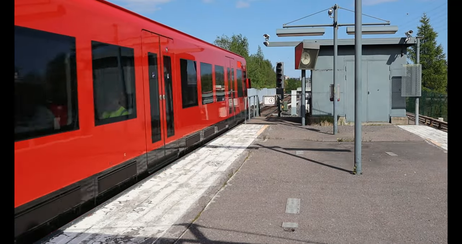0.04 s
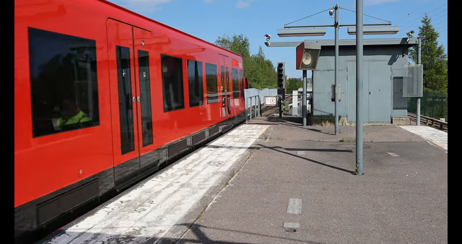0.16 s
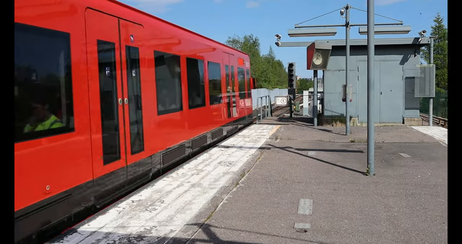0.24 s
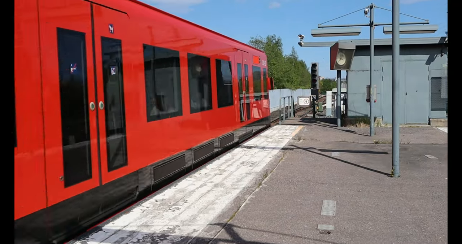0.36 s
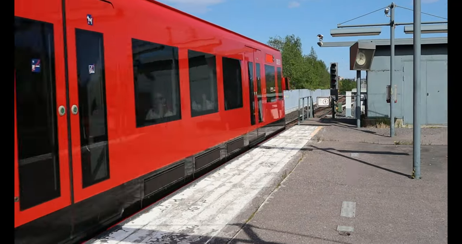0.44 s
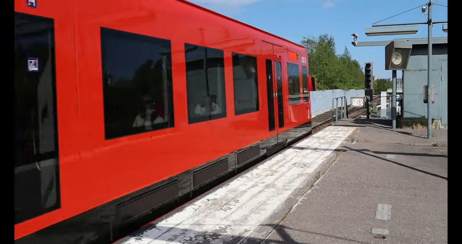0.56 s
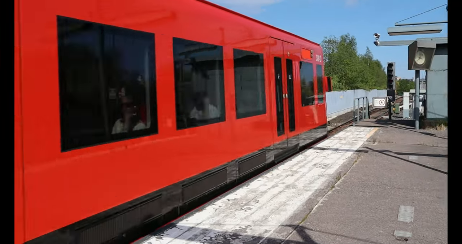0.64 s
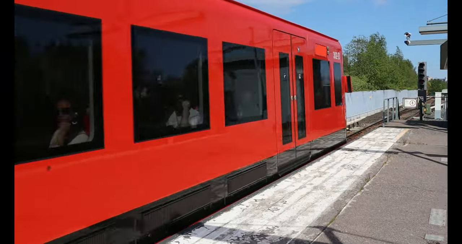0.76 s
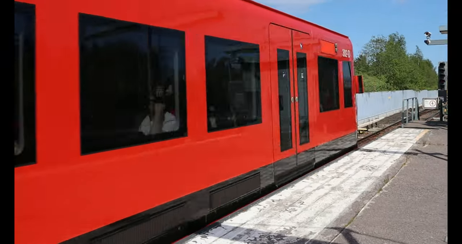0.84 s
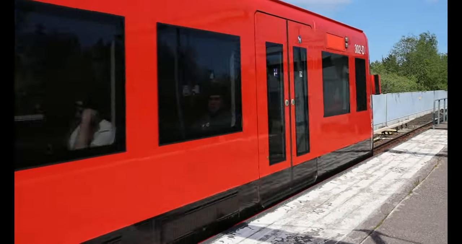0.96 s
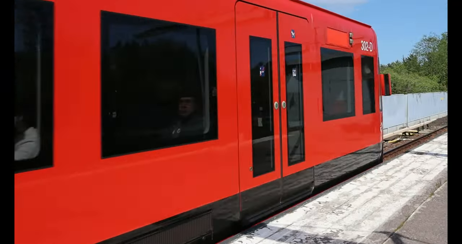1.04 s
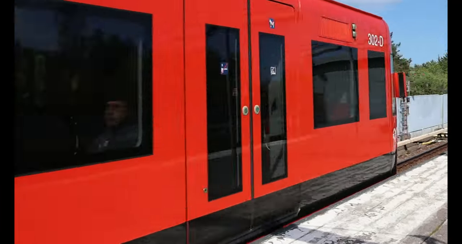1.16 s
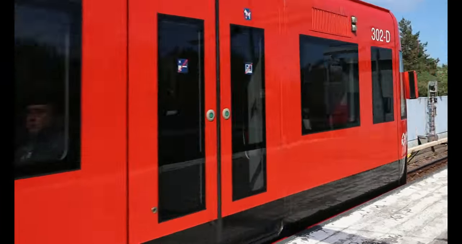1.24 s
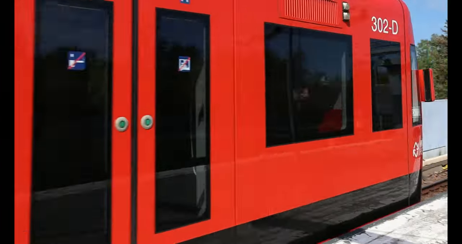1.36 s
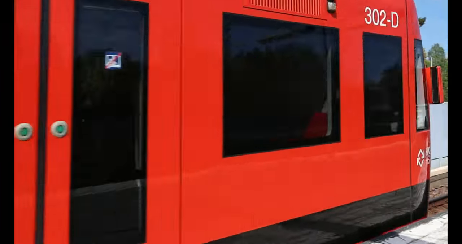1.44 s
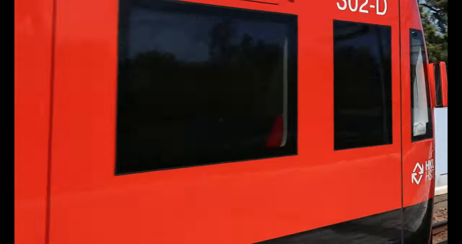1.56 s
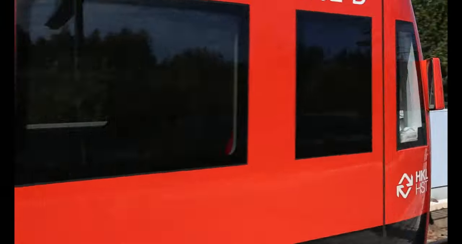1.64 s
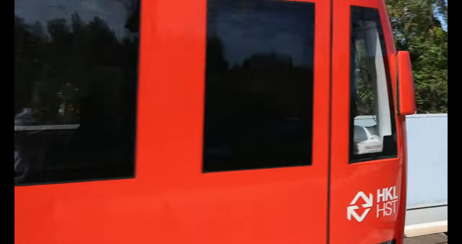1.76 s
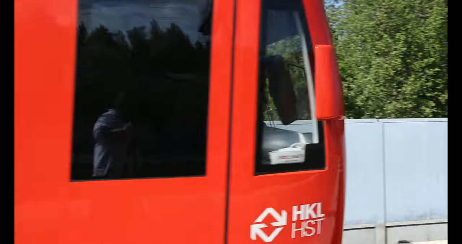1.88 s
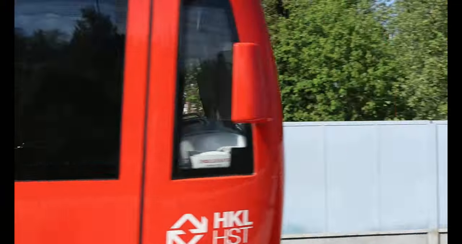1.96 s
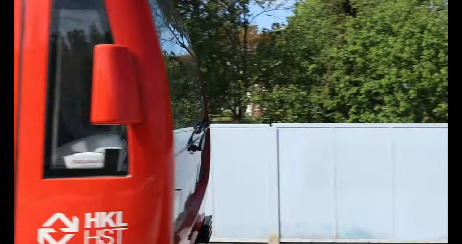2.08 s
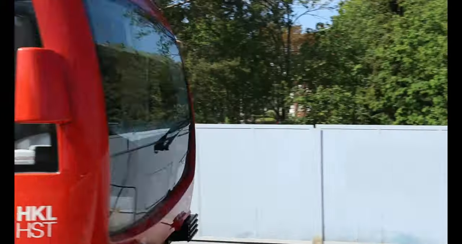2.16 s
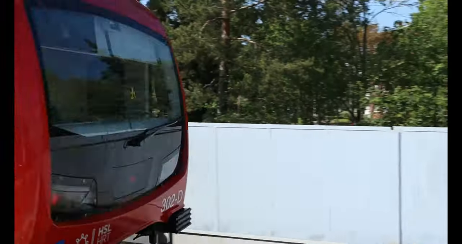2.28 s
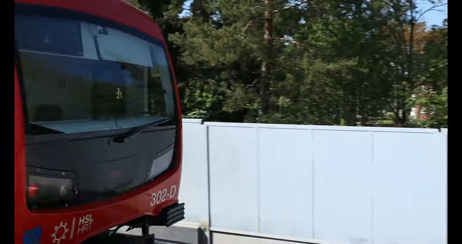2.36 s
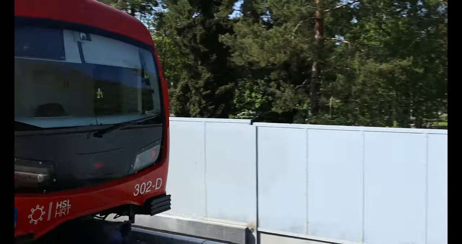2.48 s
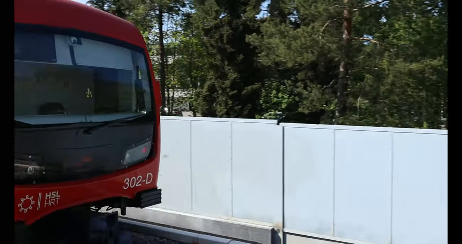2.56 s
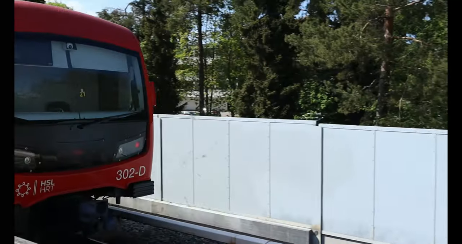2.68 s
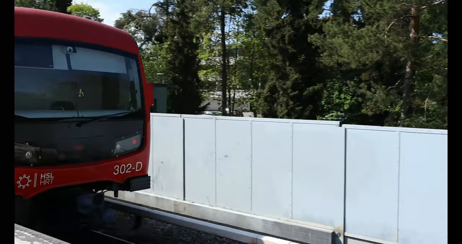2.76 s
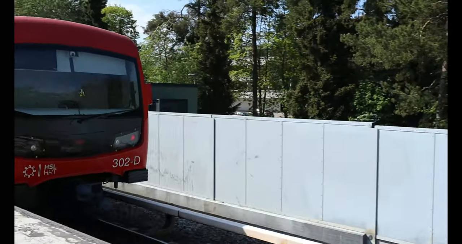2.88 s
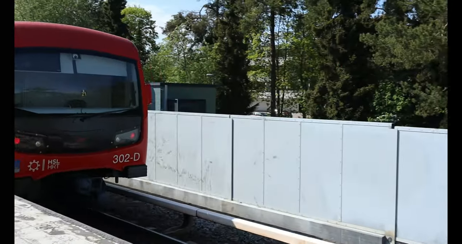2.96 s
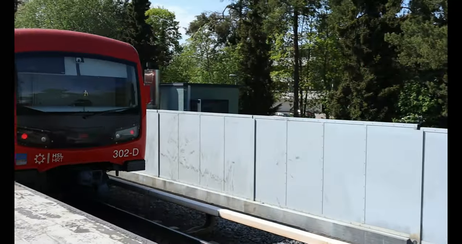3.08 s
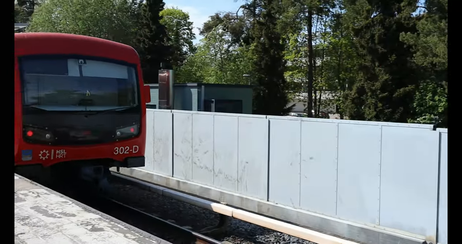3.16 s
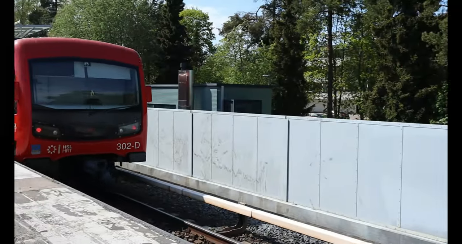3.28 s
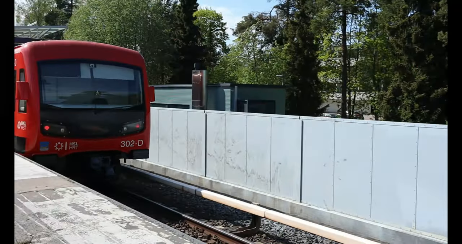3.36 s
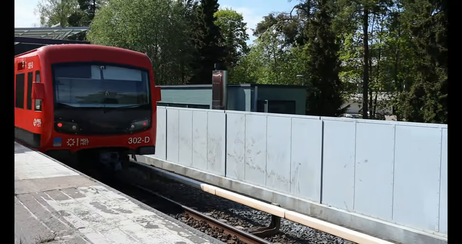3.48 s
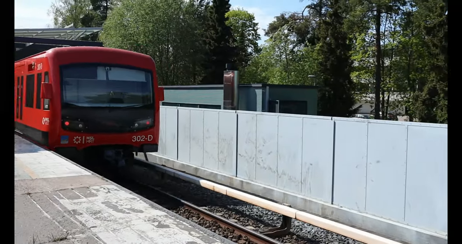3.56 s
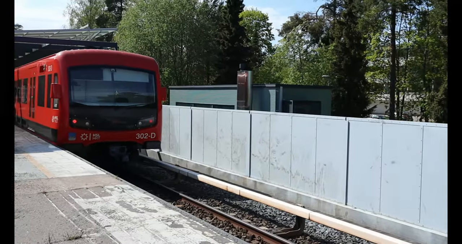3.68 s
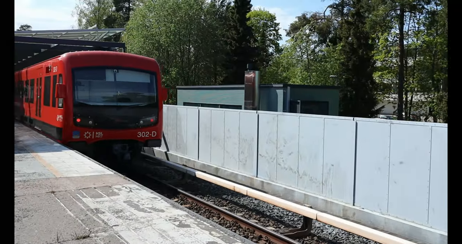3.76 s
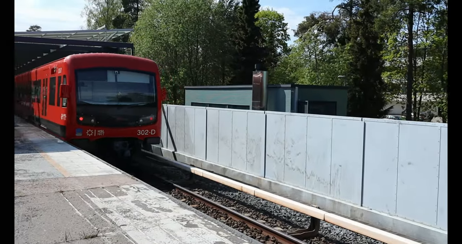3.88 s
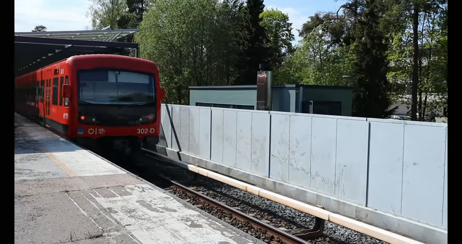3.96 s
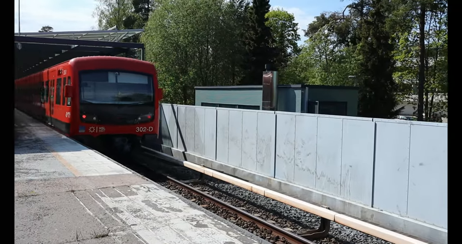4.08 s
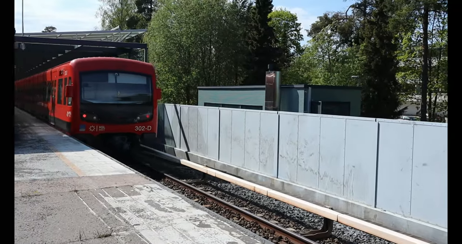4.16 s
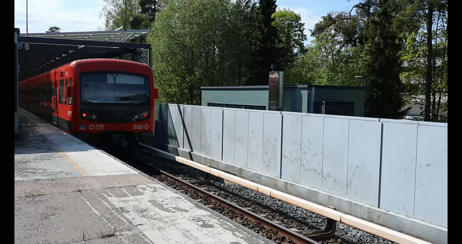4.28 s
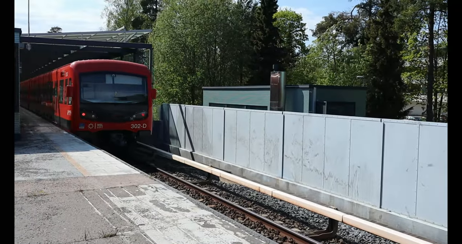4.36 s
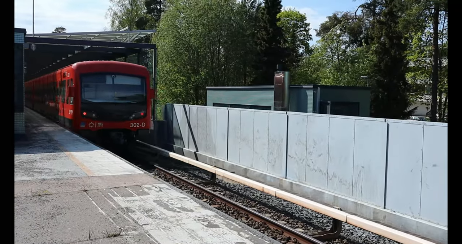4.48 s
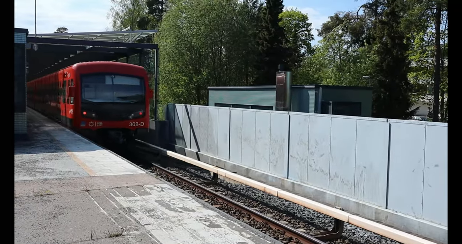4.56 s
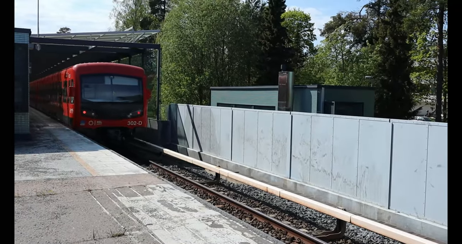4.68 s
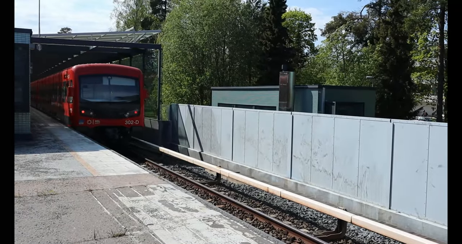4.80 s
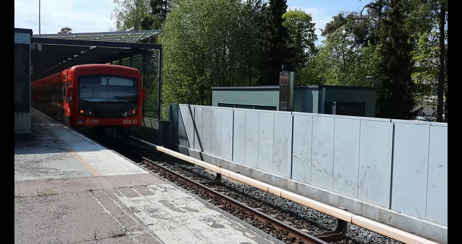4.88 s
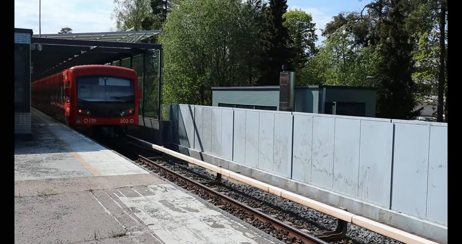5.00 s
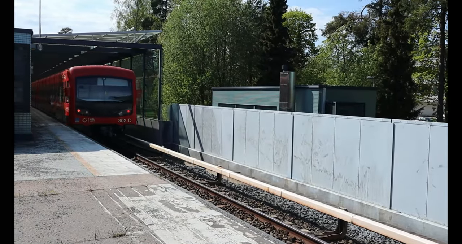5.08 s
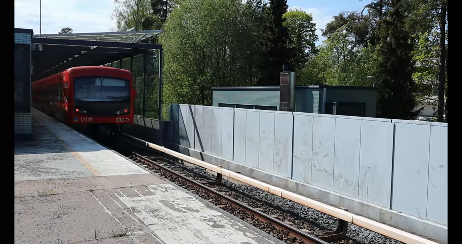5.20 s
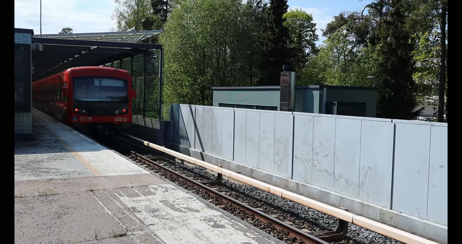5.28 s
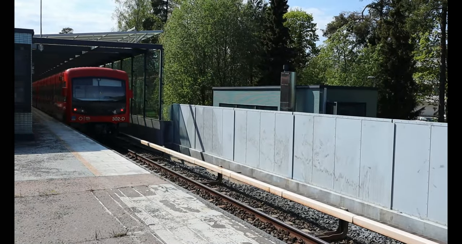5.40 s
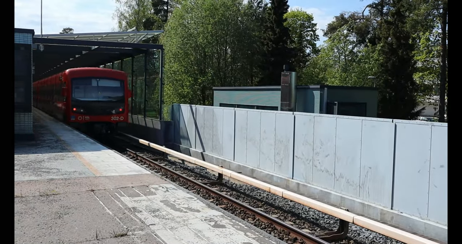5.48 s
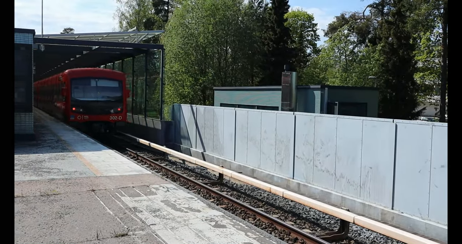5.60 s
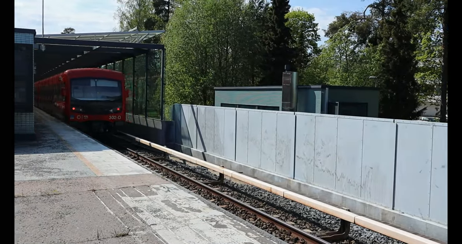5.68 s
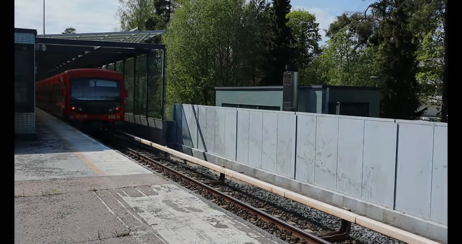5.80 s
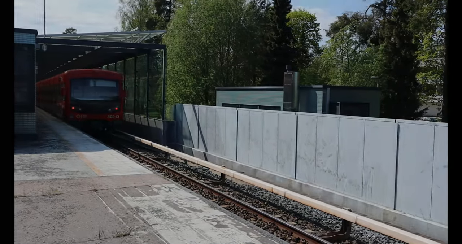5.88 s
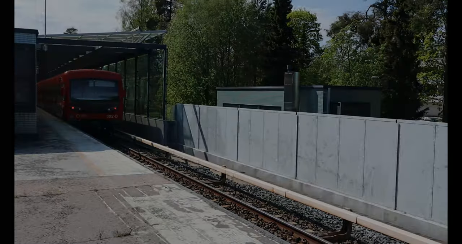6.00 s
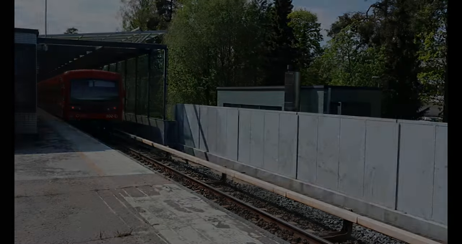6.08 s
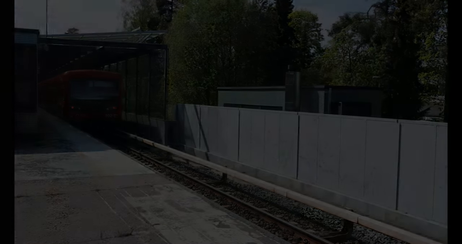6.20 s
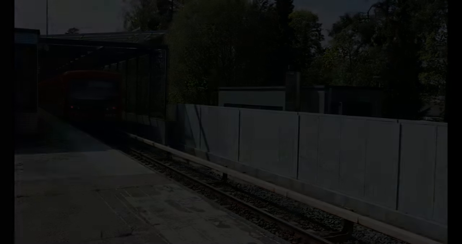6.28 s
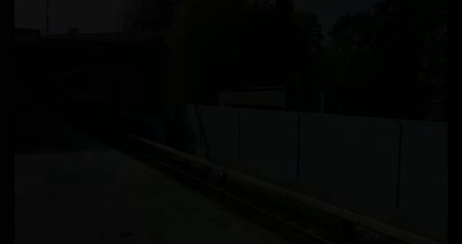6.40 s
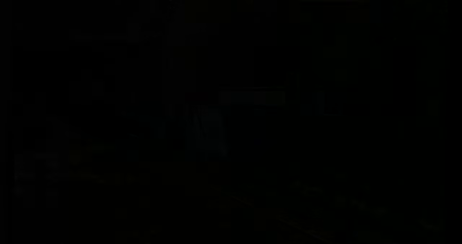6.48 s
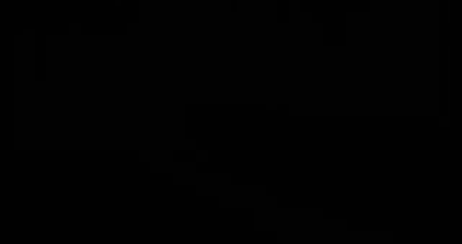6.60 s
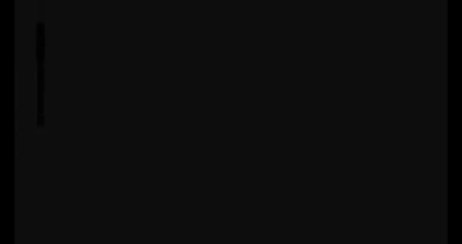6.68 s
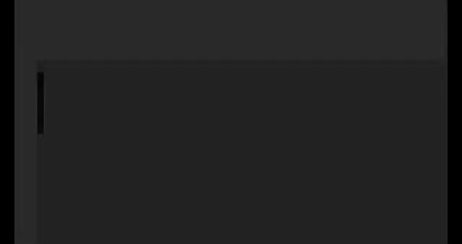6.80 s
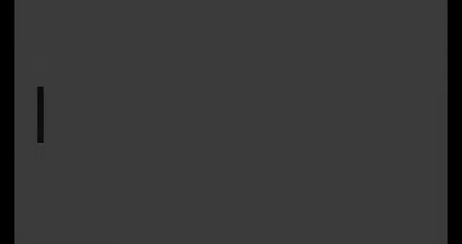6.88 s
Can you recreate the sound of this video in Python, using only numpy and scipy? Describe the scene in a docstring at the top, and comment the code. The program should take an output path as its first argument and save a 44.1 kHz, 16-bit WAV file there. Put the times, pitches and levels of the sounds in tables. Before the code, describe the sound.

Stereo microphone on a platform edge. It starts abruptly inside the roar of passing metro cars, with throaty howls, a sharp tick and heavy wheel knocks while a high whine grows. The last car goes by and fluttering steel-rail singing opens up, with short squeals. The train recedes, its whine steadier and sinking in pitch, over soft deep thumps and roofed-in rumble, before a partly faded cut.

```python
"""A metro train pulls away along an open-air platform: at first wheels roar, car bodies drum, some wheels
howl and knock, and a high drive whine grows; all tones and noises are computed from level and pitch tables.
From two seconds the tail passes: bare rails sing (fluttering resonances) and flanges scrape briefly.
The whine roughly holds its pitch, then sinks from about 4 s, as the wheel treble drops and the rumble deepens.
A roof throws noise back from about 5 s; the level then fades part of the way and the sound stops."""
import sys
import numpy as np
from scipy import signal
from scipy.fft import rfft, irfft, next_fast_len
from scipy.io import wavfile
from scipy.ndimage import uniform_filter1d, minimum_filter1d, map_coordinates

SR = 44100
rng = np.random.default_rng(int(sys.argv[2]) if len(sys.argv) > 2 else 0)


def unload_audio(sound):
    """Save the sound as a 16-bit wav file, at the path given as the first command line argument."""
    columns = np.transpose(np.atleast_2d(sound))
    # keep every value between -1 and 1, then stretch to whole-number steps
    steps = np.round(np.clip(columns, -1, 1) * 32767)
    wavfile.write(sys.argv[1], SR, steps.astype(np.int16))


N = 306450
TIME = np.arange(N) / SR
SIZE = next_fast_len(N)
FREQS = np.maximum(np.arange(SIZE // 2 + 1) * SR / SIZE, 1)

# Start and end in seconds: the tail goes by; the train runs in under a roof.
TAIL_S = (2, 2.63)
ROOF_S = (4.95, 5.06)

# Channel likeness beside the cars. Each row: frequency in Hz, likeness (-1 opposed to 1 identical).
LIKENESS_NEAR = [(100,.9995),(280,.998),(610,.96),(1250,.6),(1900,.1),(2600,-.6),(4500,-.65),(7000,-.8),(13500,-.8)]
# Channel likeness behind the train. Each row: frequency in Hz, likeness (-1 to 1).
LIKENESS_FAR = [(100,.9995),(280,.997),(400,.98),(610,.88),(1000,.52),(1500,0),(2200,.22),(3700,-.2),(6400,.15),(9000,-.6),(13500,-.75)]


def from_db(db):
    """Decibels to amplitude gain."""
    return 10 ** (np.asarray(db) / 20)


def rms_one(x):
    """Scale to unit rms."""
    return x / np.sqrt(np.mean(x ** 2) + 1e-20)


def over_freqs(points):
    """Interpolate a table linearly over log frequency."""
    hz, value = np.transpose(points)
    return np.interp(np.log(FREQS), np.log(hz), value)


def pan(left_over_right_db):
    """Power-preserving channel gains for a left-over-right level difference."""
    gains = from_db([[left_over_right_db], [0]])
    return np.sqrt(2) * gains / np.hypot(from_db(left_over_right_db), 1)


def drift(rate_hz):
    """Random wander of rms 1: straight lines between random values, rate_hz values a second."""
    knots = rng.standard_normal(2048)
    return rms_one(map_coordinates(knots, [TIME * rate_hz], order=1, mode="wrap"))


def ramp(start_s, end_s):
    """Linear rise from 0 to 1 between two moments."""
    return np.clip((TIME - start_s) / max(end_s - start_s, 1e-3), 0, 1)


def swell(centre_s, half_s):
    """Gaussian bump of height 1, down to 1/e at half_s from its centre."""
    return np.exp(-((TIME - centre_s) / half_s) ** 2)


def swells_db(rows):
    """Sum of bumps in dB from rows of centre, half length and height."""
    return sum(db * swell(centre_s, half_s) for centre_s, half_s, db in rows)


def stereo(mid, side, likeness):
    """Mix two independent signals into channels of a given likeness; rms 1 is set by the callers."""
    return np.sqrt(1 + likeness) * mid + np.sqrt(1 - likeness) * side * [[1], [-1]]


def noise(spectrum, likeness):
    """Stereo noise of rms 1, coloured by a dB table, with 12 dB per octave skirts beyond its ends."""
    low_skirt = np.minimum(FREQS / spectrum[0][0], 1) ** 2
    high_skirt = np.minimum(spectrum[-1][0] / FREQS, 1) ** 2
    colour = from_db(over_freqs(spectrum)) * low_skirt * high_skirt
    mid, side = rfft(rng.standard_normal((2, SIZE))) * colour
    alike = np.clip(over_freqs(likeness), -1, 1)
    return rms_one(irfft(stereo(mid, side, alike), SIZE)[:, :N])


def blurred_tone(hz, width_hz, likeness, firmness=0):
    """Tone of rms 1 smeared over many paths: height and phase flutter; firmness (0-1) evens the height."""
    step = 16   # samples per flutter value
    shape = (2, N // step + 1)
    white = rng.standard_normal(shape) + 1j * rng.standard_normal(shape)
    pole = np.exp(-2 * np.pi * .75 * width_hz * step / SR)   # half-power width is about width_hz
    flutter = signal.lfilter([1], [1, -2 * pole, pole * pole], white)
    flutter = flutter / np.abs(flutter) ** firmness
    carrier = np.exp(2j * np.pi * np.cumsum(hz + np.zeros(N)) / SR)
    at = np.arange(N) / step
    mid, side = [(np.interp(at, np.arange(len(f)), f) * carrier).real for f in flutter]
    return rms_one(stereo(mid, side, np.clip(likeness, -1, 1)))


def passing(near, far):
    """Equal-power crossfade from beside the cars to the open track as the tail goes by."""
    behind = ramp(2.13, 2.38)
    return np.sqrt(1 - behind) * near + np.sqrt(behind) * far


def receding(beside_db, behind_db, loss_db_per_s):
    """Level in dB: steady beside the cars, a ramp as the tail goes by, then a steady change with time."""
    step_db = (behind_db - beside_db) * ramp(*TAIL_S)
    return beside_db + step_db - loss_db_per_s * np.maximum(TIME - TAIL_S[1], 0)


def wheels_gone():
    """Rises from 0 to 1 as the last wheels get too far away for their treble to carry."""
    return ramp(4.51, 4.78)


def rumble_level(start_db=-41.0, growth_db_per_s=1.1, roof_db=5.0, build_s=0.95):
    """Ground rumble in dB: steady growth, a few surges, a further build-up under the roof."""
    # Surges. Each row: centre in seconds, half length in seconds, rise in dB.
    surges = [(1.35, 0.33, 4), (3.25, 0.16, 3.5)]
    roof = roof_db * ramp(ROOF_S[0], ROOF_S[0] + build_s)
    return start_db + growth_db_per_s * TIME + swells_db(surges) + roof


def drumming_level(swing_db=1.0, period_s=1.48, peak_s=3.56):
    """Body drumming in dB: louder as bogies pass close by; behind the train it swells and sinks slowly."""
    # Bogies passing. Each row: centre in seconds, half length in seconds, extra drumming in dB.
    bogie_passes = [(0.15, 0.18, 2.5), (1.18, 0.064, 7.5), (1.417, 0.15, 3.5), (1.76, 0.39, 2.5)]
    base_db = receding(beside_db=-26.5, behind_db=-25.0, loss_db_per_s=0.68)
    cycle = np.cos(2 * np.pi * (TIME - peak_s) / period_s)
    return base_db + swells_db(bogie_passes) + swing_db * ramp(*TAIL_S) * cycle


def roar_level(roof_db=2.5, front_db=3.5):
    """Wheel roar in dB: eases until the tail comes, falls with distance, gains under the roof."""
    base_db = receding(beside_db=-19.5, behind_db=-21.5, loss_db_per_s=1.17)
    return base_db + front_db * (1 - ramp(0, TAIL_S[0])) + roof_db * ramp(*ROOF_S)


def rolling(uneven_db=0.42):
    """Rough treads shake the ground, drum on the car bodies and roar from the wheels: shaped noises."""
    # Rumble beside the cars. Each row: frequency in Hz, relative density in dB.
    rumble_near = [(18,-48.5),(30,-30),(45,3),(60,5),(85,11),(120,12),(170,4.5),(300,-37)]
    # Rumble behind the train. Each row: frequency in Hz, relative density in dB.
    rumble_far = [(18,-38),(30,-21),(42,-3),(54,-0.5),(72,-1),(115,1.5),(170,-3),(300,-40)]
    # Car body drumming. Each row: frequency in Hz, relative density in dB.
    body_colour = [(70, -40.5), (130, -12), (205, -5), (270, 0), (320, -1), (410, -2), (490, -16.5),
                   (800, -41)]
    # Wheel roar beside the cars. Each row: frequency in Hz, relative density in dB.
    roar_near = [(250,-14.5),(450,-5.5),(650,-1.5),(850,-0.5),(1050,0),(1300,-4.5),(2000,-9),(3200,-14.5),(4200,-22),(7000,-43.5)]
    # Wheel roar behind the train. Each row: frequency in Hz, relative density in dB.
    roar_far = [(250, -22.5), (450, -1), (600, -4), (860, 2.5), (1150, -3), (1450, -4), (2000, -10),
                (3200, -27), (4200, -22), (7000, -64.5)]
    rumble = passing(noise(rumble_near, LIKENESS_NEAR), noise(rumble_far, LIKENESS_NEAR))
    body = noise(body_colour, LIKENESS_NEAR)
    roar = passing(noise(roar_near, LIKENESS_NEAR) * pan(-.4), noise(roar_far, LIKENESS_FAR) * pan(-1.7))
    rumble = rumble * from_db(rumble_level())
    body = body * from_db(drumming_level() + uneven_db * drift(22))
    roar = roar * from_db(roar_level() + uneven_db * drift(14))
    return rumble + body + roar


def singing_level(rise_db=8, rise_s=0.8, drop_db=8, lull_db=2):
    """Rail ringing in dB: an early rise, strongest behind the tail, a brief ebb, a quick drop far off."""
    base_db = receding(beside_db=-24.5, behind_db=-18.5, loss_db_per_s=3.0)
    lull = lull_db * swell(3.55, 0.28)
    return base_db - rise_db * (1 - ramp(0, rise_s)) - drop_db * wheels_gone() - lull


def sizzle_level(drop_db=5):
    """Fine sizzle in dB: creeps up behind the train with flares, drops once the wheels are far."""
    # Flares. Each row: centre in seconds, half length in seconds, rise in dB.
    flares = [(2.27, 0.08, 4), (3.88, 0.28, 8), (4.9, 0.12, 2.5)]
    base_db = receding(beside_db=-48.5, behind_db=-50.0, loss_db_per_s=-0.5)
    return base_db + swells_db(flares) - drop_db * wheels_gone()


def rails(shielded_db=-8, uneven_db=1.0, wander_hz=22, hiss_drop_db=3.0, flutter_db=1.27):
    """Wheels keep the rails ringing in wandering, fluttering resonances over a hiss of steel on steel."""
    # Rail resonances. Each row: frequency in Hz, width in Hz, relative level in dB,
    # left-over-right in dB, channel likeness (-1 to 1).
    rail_modes = [(1632,97,-14,-1,-0.32),(2545,500,-4.5,-5,0),(3074,105,-5,-7,-0.1),(3340,450,-7,-3.5,-0.28),(4750,230,-24,5,-.1),(6780,170,-28,-4,0.27)]
    # Hiss beside the cars. Each row: frequency in Hz, relative density in dB.
    hiss_near = [(1400,-8),(2100,7),(2520,18.5),(2800,13.5),(3100,14.5),(3700,0),(4300,-0.5),(5000,7),(6200,0),(8000,-5),(10000,-42),(14000,-36)]
    # Hiss behind the train. Each row: frequency in Hz, relative density in dB.
    hiss_far = [(1200,-1),(2200,10.5),(3400,6.5),(4100,3),(5000,4.5),(6000,2),(6900,0.5),(8200,-3.5),(10000,-14),(14000,-48.5)]
    # Fine sizzle. Each row: frequency in Hz, relative density in dB.
    sizzle_colour = [(5000,-9),(7500,-11.5),(8500,-3),(9300,-1),(10400,9),(12000,-3.5),(13000,-8.5),(14000,-22.5)]
    ringing = 0
    for hz, width_hz, db, side_db, alike in rail_modes:
        gain = from_db(db + flutter_db * drift(28)) * pan(side_db)
        ringing = ringing + gain * blurred_tone(hz + wander_hz * drift(11), width_hz, alike)
    ringing = ringing * from_db(shielded_db * (1 - ramp(1.97, 2.49)))   # cars cover the rails until by
    hiss = passing(noise(hiss_near, LIKENESS_NEAR) * pan(.4), noise(hiss_far, LIKENESS_FAR) * pan(-0.88))
    hiss_db = receding(beside_db=-30, behind_db=-31.5, loss_db_per_s=1.5) - hiss_drop_db * wheels_gone()
    sizzle = from_db(sizzle_level()) * noise(sizzle_colour, LIKENESS_NEAR)
    contact = from_db(uneven_db * drift(16))
    return contact * (from_db(singing_level()) * ringing + from_db(hiss_db) * hiss + sizzle)


def whine_level(full_db=-31, rise_db_per_s=7, drive_by_s=2.6, roof_db=1.0):
    """Whine in dB: a steady rise until the drive is by, then level, a little more under the roof."""
    return full_db - rise_db_per_s * np.maximum(drive_by_s - TIME, 0) + roof_db * ramp(*ROOF_S)


def whine(core_swing_db=0.9, core_wobble_hz=6, waver_hz=15, masked_db=-4, firmness=0.2, covered_db=-4):
    """Drive tone and partials, smeared by echoes; as pitch sinks it steadies, core and overtones emerge."""
    # Drive pitch. Each row: time in seconds, pitch in Hz.
    pitch_path = [(0, 2545), (3.95, 2500), (4.5, 2440), (4.64, 2365), (4.95, 2265), (5.25, 2208),
                  (5.62, 2128), (6.05, 2056), (6.63, 1980)]
    # Swells of the lowest tone. Each row: centre in seconds, half length in seconds, change in dB.
    tone_swells = [(4.0, 0.11, 5), (4.65, 0.1, 2), (5.06, 0.08, -9), (5.26, 0.07, 6), (5.63, 0.1, 4),
                   (5.78, 0.04, -5), (6.08, 0.05, 6), (6.22, 0.05, -10), (6.4, 0.05, 2.5), (6.5, 0.04, -7)]
    # Partials. Each row: multiple of the pitch, relative level in dB, width in Hz,
    # left-over-right in dB, channel likeness (-1 to 1).
    partials = [(1,2,85,-7.5,0.2),(1.5,-16.5,240,-4.5,-0.2),(2,-3,102,3,-0.32),(2.5,-26,170,-0.5,-0.5),(3,-20,95,2,0.3),(3.5,-26,260,-2.5,-0.44),(4,-24.5,300,-5.5,-0.53),(4.5,-40,300,-2,-0.5),(5,-26.5,420,-2,-0.49),(6,-26.5,420,-1,-0.5)]
    # Radiation of the underframe. Each row: frequency in Hz, gain in dB.
    radiation = [(2000,-10.5),(2500,2),(3100,10.5),(3500,18),(3950,-4.5),(4500,-0.5),(5100,-3),(5600,-2),(6000,13),(6300,5),(6800,0),(7400,-3.5),(10300,-5.5),(11400,3.5),(12300,-3),(13400,-20)]
    pitch = np.interp(TIME, *np.transpose(pitch_path)) + waver_hz * drift(14) * (1 - wheels_gone())
    core = np.sin(2 * np.pi * np.cumsum(pitch + core_wobble_hz * drift(40)) / SR)
    swelling = from_db(swells_db(tone_swells))
    emerging = from_db(masked_db * (1 - wheels_gone()) + covered_db * (1 - ramp(*TAIL_S)))
    out = swelling * from_db(core_swing_db * drift(20)) * ramp(3.2, 4.96) * core * pan(-4.5)
    for multiple, db, width_hz, side_db, alike in partials:
        hz = pitch * multiple
        gain = from_db(db + np.interp(hz, *np.transpose(radiation)))
        gain = gain * (swelling if multiple == 1 else emerging)
        out = out + gain * pan(side_db) * blurred_tone(hz, width_hz, alike, firmness)
    return from_db(whine_level()) * out


def howls(edge_s=0.012, wobble_hz=15, wobble_rate_hz=110):
    """A wheel sticks and slips: a firm, slightly wavering tone, steady or gliding, that breaks off."""
    # Howls. Each row: start in seconds, length in seconds, starting pitch in Hz, glide in Hz per second,
    # level in dB, left-over-right in dB.
    howl_events = [(0.0, 0.07, 392, -100, -19, 0), (0.02, 0.13, 1040, -100, -28, 6),
                   (0.09, 0.055, 805, 0, -18, 1), (0.14, 0.07, 376, -150, -16.5, 0),
                   (0.22, 0.04, 800, 300, -19.5, 1), (0.24, 0.07, 386, -150, -22, 0),
                   (0.32, 0.13, 366, 0, -27, 0), (1.41, 0.11, 280, -150, -22.5, 0),
                   (1.82, 0.07, 335, 0, -24, 0), (2.35, 0.14, 1728, -450, -25, -4.5),
                   (2.355, 0.025, 4740, 0, -31, 0), (2.405, 0.035, 4890, 0, -29.5, 2),
                   (2.48, 0.04, 4850, -2000, -29, -2), (2.63, 0.19, 2215, -200, -29.5, -3.5)]
    out = np.zeros((2, N))
    waver = wobble_hz * drift(wobble_rate_hz)
    for start, length, hz, glide, db, side_db in howl_events:
        end = start + length
        slipping = ramp(start - edge_s, start + edge_s) * (1 - ramp(end - edge_s, end + edge_s))
        on = slipping > 0
        pitch = hz + glide * (TIME[on] - start) + waver[on] * np.sqrt(hz / 1000)
        tone = np.sqrt(2) * np.sin(2 * np.pi * np.cumsum(pitch) / SR)   # rms 1
        out[:, on] += from_db(db) * slipping[on] * pan(side_db) * tone
    return out


def knocks(rise_s=0.003, decay_s=0.0082):
    """A wheel bumps over a flaw in the rail: a short, dull, decaying burst of noise within the roar."""
    # Knocks. Each row: peak time in seconds, level in dB.
    blow_events = [(0.347, -16.5), (1.27, -14.5), (1.455, -19), (1.525, -19.5)]
    # Knock colour. Each row: frequency in Hz, relative density in dB.
    knock_colour = [(250, -1), (900, 5), (1900, -12.5), (3500, -22)]
    blows = 0
    for peak_s, db in blow_events:
        decay = np.exp(-np.maximum(TIME - peak_s, 0) / decay_s)
        blows = blows + from_db(db) * ramp(peak_s - rise_s, peak_s) * decay
    return blows * noise(knock_colour, LIKENESS_NEAR)


def ticks(decay_s=0.0031, low_hz=5500):
    """A sharp tick close by: a decaying burst of high-passed noise, opposed in the two channels."""
    # Ticks. Each row: start in seconds, level in dB before the high-pass.
    tick_events = [(0.357, -13.5)]
    bursts = sum(from_db(db) * (TIME >= s) * np.exp(-np.abs(TIME - s) / decay_s) for s, db in tick_events)
    high_pass = signal.butter(2, low_hz, "high", fs=SR, output="sos")
    bright = signal.sosfilt(high_pass, bursts * rng.standard_normal(N) + 1e-18)
    return bright * [[1], [-.6]]


def squeals(rise_s=0.01, fall_s=0.061, firmness=0.35):
    """Panels boom and flanges scrape: one resonance of wheel or car body swells for a moment."""
    # Squeals. Each row: start in seconds, length in seconds, frequency in Hz, width in Hz, level in dB,
    # left-over-right in dB (reduced below 2 kHz).
    squeal_events = [(1.14, 0.86, 655, 170, -23, -5), (1.14, 0.74, 300, 70, -25, 0),
                     (1.6, 0.42, 315, 55, -20.5, -4), (1.55, 0.75, 170, 30, -37, 0),
                     (2.37, 0.17, 1680, 50, -35, -4.5), (2.35, 0.17, 6650, 400, -37, -0.5),
                     (2.35, 0.16, 4800, 190, -30, 0), (2.365, 0.145, 3250, 260, -17.5, -6),
                     (2.62, 0.22, 2400, 110, -28, -3.5), (2.77, 0.08, 3080, 130, -19.5, -7),
                     (4.38, 0.06, 3100, 90, -24, -7), (2.776, 0.14, 3750, 500, -28.5, -2),
                     (2.78, 0.3, 4670, 140, -38, 0), (3.28, 0.12, 6200, 300, -41, 0),
                     (4.74, 0.3, 9200, 600, -54, 0), (4.82, 0.5, 420, 30, -31.5, 0),
                     (5.093, 0.13, 1434, 110, -31.5, 0), (2.55, 0.55, 1950, 260, -35, -3),
                     (3.85, 0.7, 4560, 350, -44, 0), (3.9, 0.62, 3100, 70, -31, -6),
                     (5.6, 1, 3060, 50, -40, -5), (6.15, 0.45, 5000, 120, -53, 0),
                     (2.52, 0.1, 4880, 120, -37, 0), (2.28, 0.4, 280, 25, -30, 0),
                     (3.82, 0.3, 270, 18, -29, 0), (4.6, 0.45, 245, 25, -32, 0),
                     (5.66, 0.22, 1290, 86, -30, -2), (6.07, 0.46, 2540, 50, -38.5, -5)]
    out = 0
    for start, length, hz, width_hz, db, side_db in squeal_events:
        end = start + length
        rubbing = ramp(start - rise_s, start + rise_s) * (1 - ramp(end - fall_s / 2, end + fall_s))
        alike = np.interp(hz, FREQS, over_freqs(LIKENESS_FAR))
        shaded = min(hz / 2000, 1) ** 2   # long waves reach both channels equally
        tone = blurred_tone(hz, width_hz, alike, firmness)
        out = out + from_db(db) * rubbing * pan(side_db * shaded) * tone
    return out


def hum(hz=118, level_db=-42, width_hz=3.4):
    """A low wavering hum, identical in both channels, comes forward as the tail passes."""
    return from_db(level_db) * ramp(1.6, 3.3) * blurred_tone(hz, width_hz, 1)


def thumps(half_s=0.019):
    """Deep, soft thumps as the train runs off: sine bursts of a few cycles under a smooth bump."""
    # Thumps. Each row: centre in seconds, frequency in Hz, envelope peak in dB.
    thump_events = [(4.715, 56, -30), (5.624, 86, -22), (5.94, 56, -25)]
    out = 0
    for s, hz, db in thump_events:
        out = out + from_db(db) * swell(s, half_s) * np.sin(2 * np.pi * hz * (TIME - s))
    return out


def scene():
    """Everything heard from the platform."""
    return rolling() + rails() + whine() + howls() + knocks() + ticks() + squeals() + hum() + thumps()


def record(dry, end_s=6.632, fade_share=0.43, ceiling=.9, cutoff_hz=14100):
    """Abrupt start, partial fade and stop; a limiter holds the highest peaks, a low-pass cuts the top."""
    faded = dry * (1 - fade_share * ramp(5.9, 6.59))   # share of amplitude lost
    gated = faded * ramp(0, .002) * (1 - ramp(end_s - .004, end_s + .004))
    allowed = ceiling / np.maximum(np.abs(gated).max(axis=0), ceiling)
    gain = uniform_filter1d(minimum_filter1d(allowed, size=201), size=201)
    low_pass = signal.ellip(10, .1, 80, cutoff_hz, fs=SR, output="sos")
    return signal.sosfilt(low_pass, gated * gain)


dry = scene()
out = record(dry)
unload_audio(out)
```